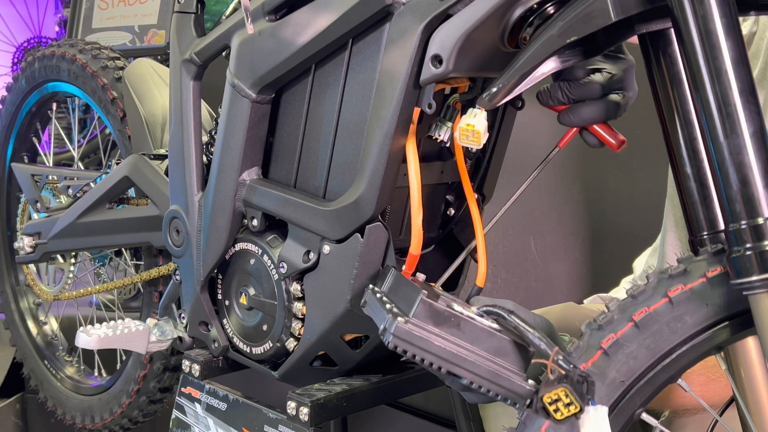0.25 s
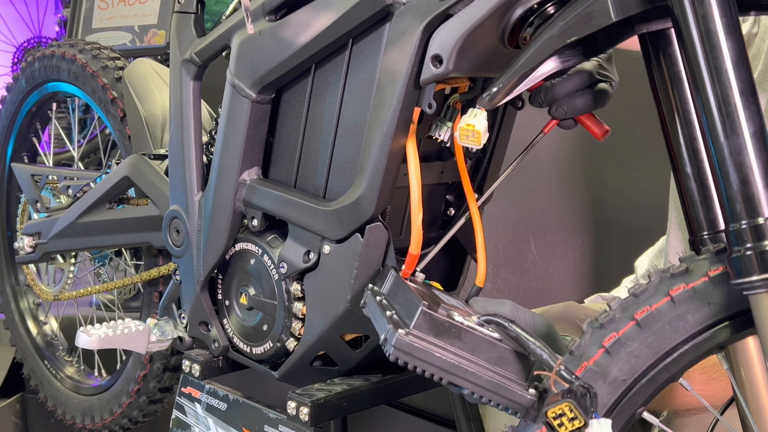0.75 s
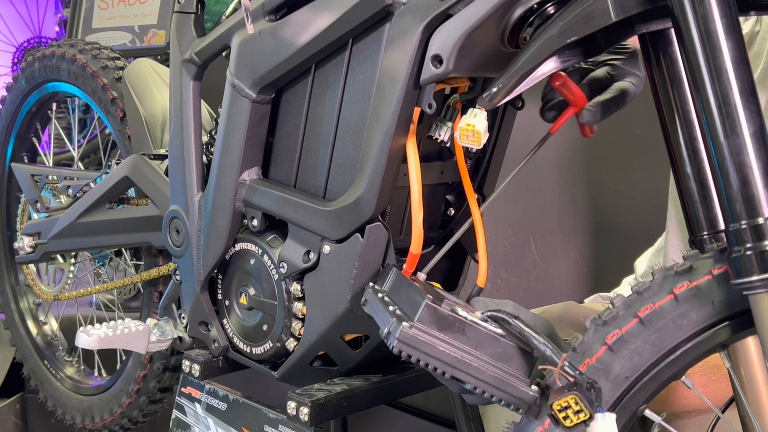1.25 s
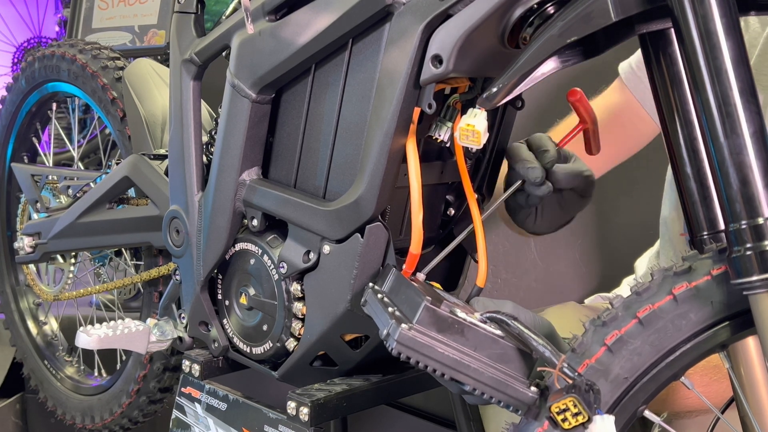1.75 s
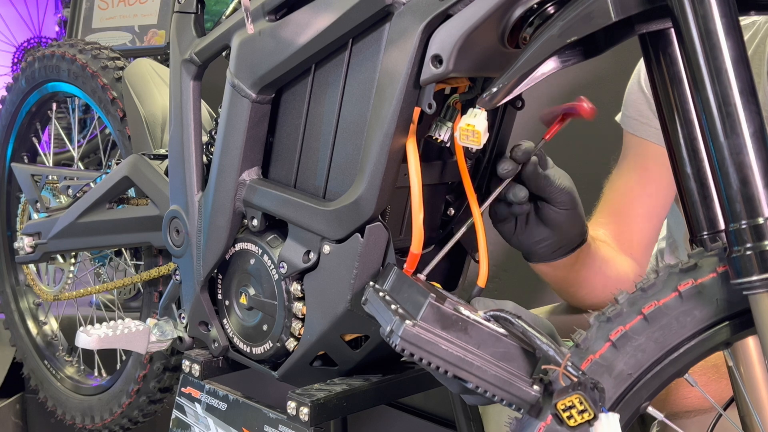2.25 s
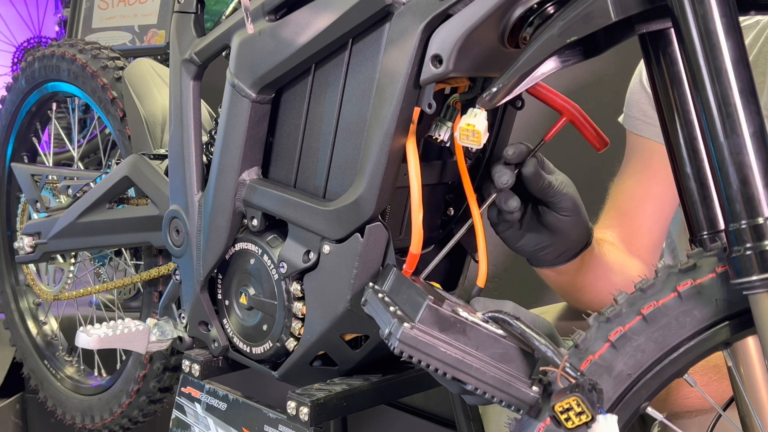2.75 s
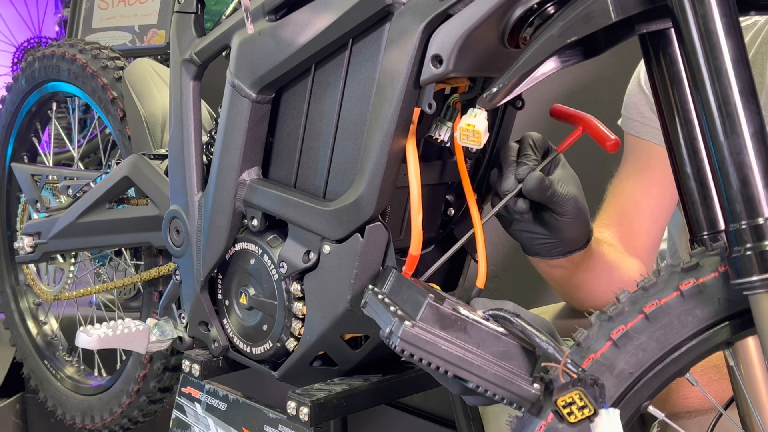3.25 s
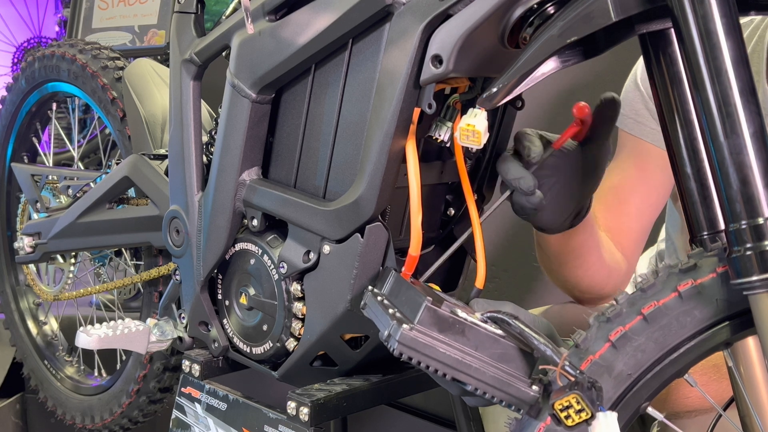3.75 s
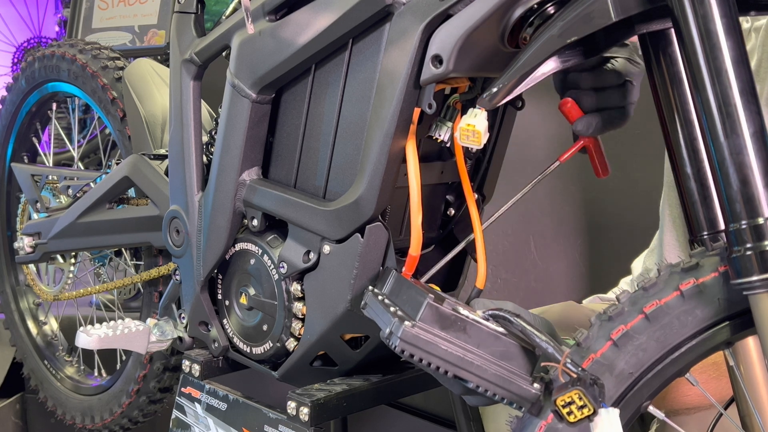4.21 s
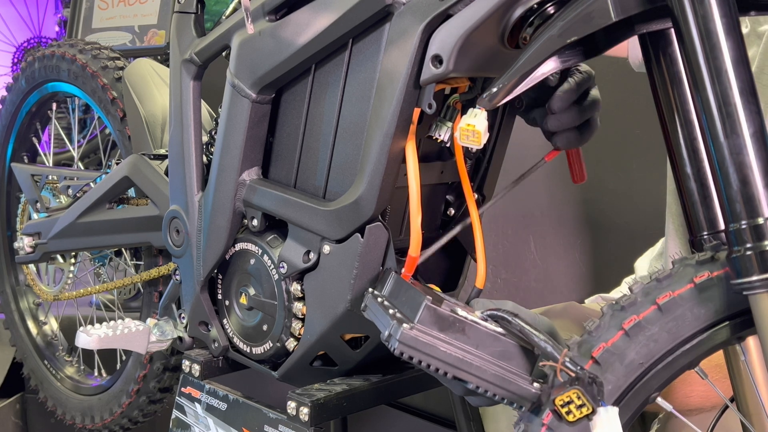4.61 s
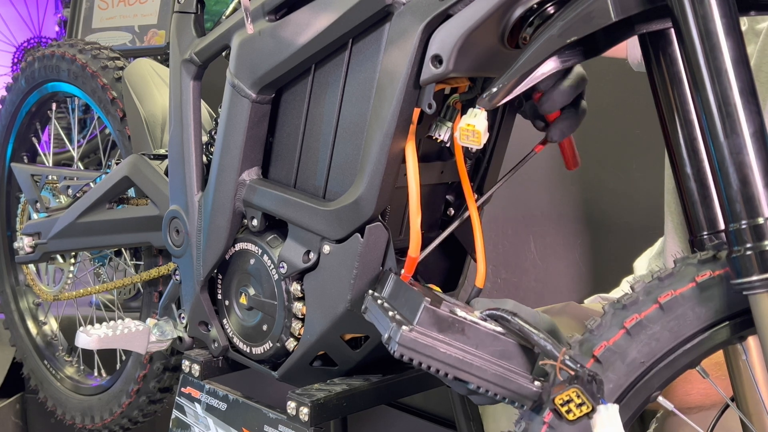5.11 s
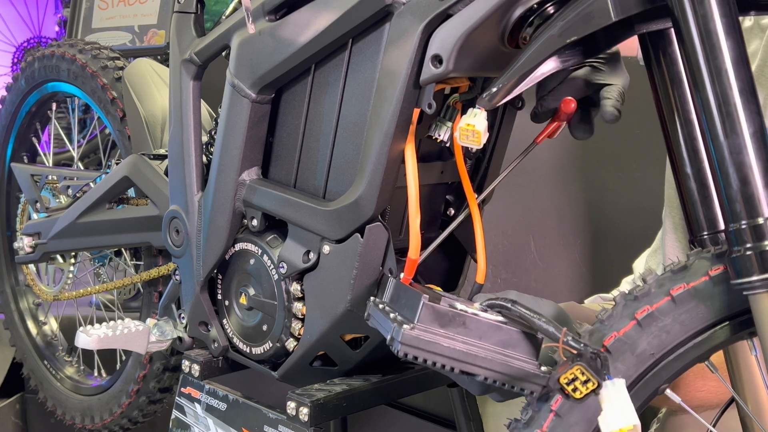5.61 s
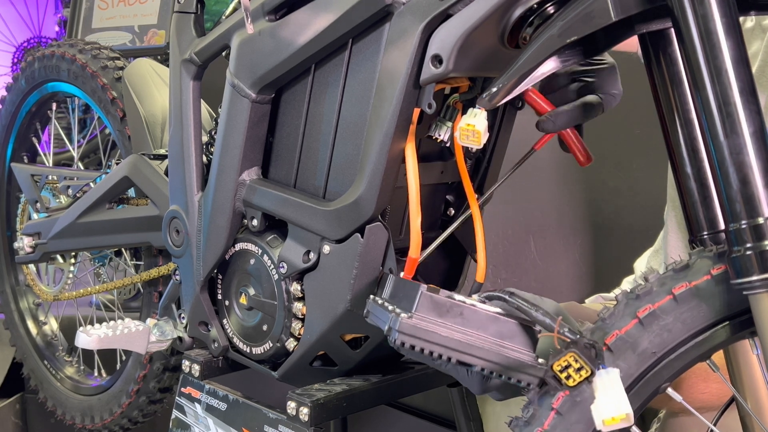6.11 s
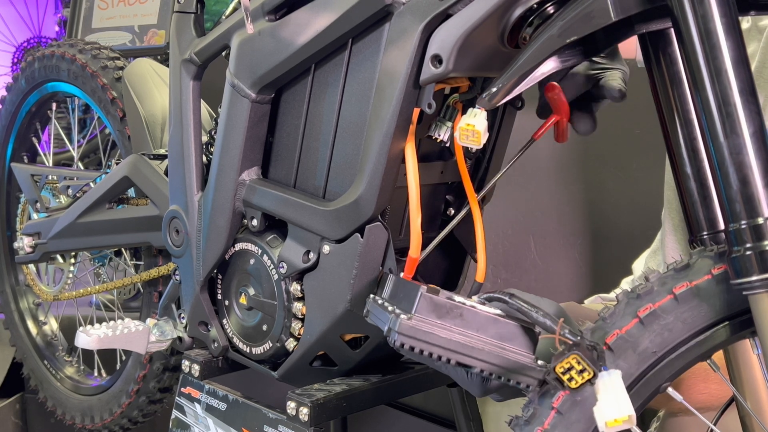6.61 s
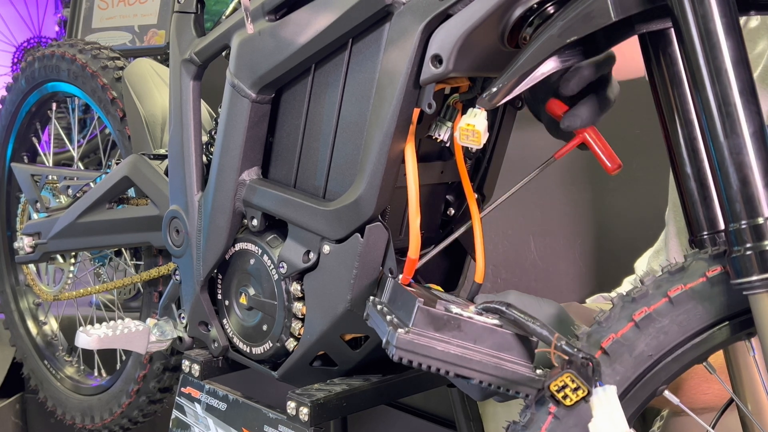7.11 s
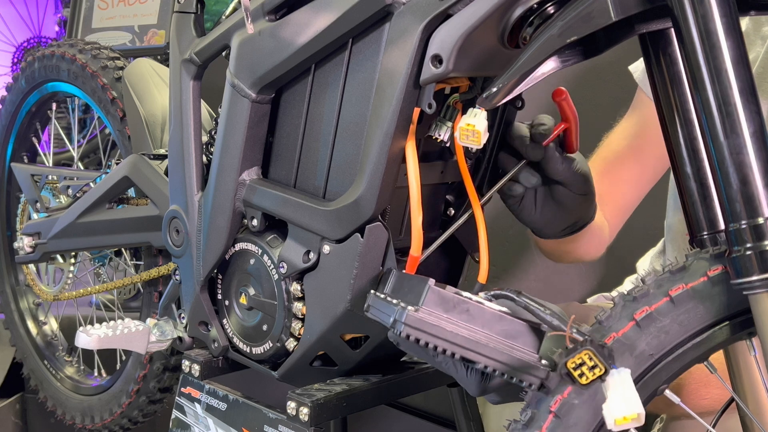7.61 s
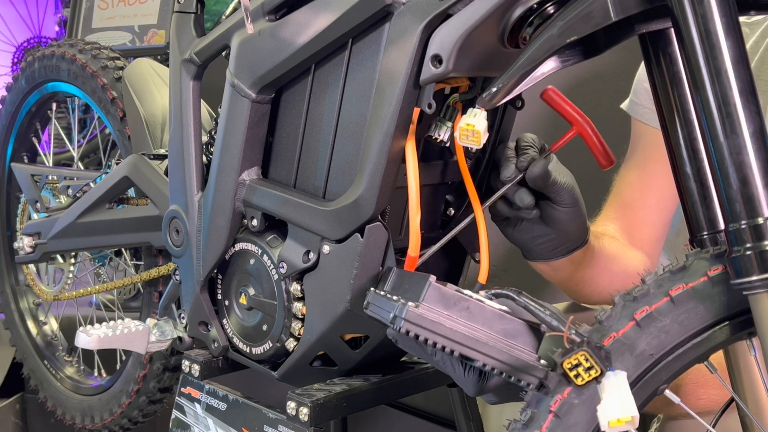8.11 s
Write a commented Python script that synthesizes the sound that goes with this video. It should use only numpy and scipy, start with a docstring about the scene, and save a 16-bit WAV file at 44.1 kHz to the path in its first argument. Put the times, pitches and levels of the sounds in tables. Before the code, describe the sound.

Close-up wrench work in a small workshop: irregular dry steel ticks, tiny scrapes and squeaks, one sharp slam and one loose clunk.

```python
"""The soft steady rush of a small workshop comes first, with a glove's faint rustle on a handle.
Close by, a T-handle socket wrench works on the nuts of a motorbike: noise cracks and decaying modes
make its taps and one slam, runs of tiny slips its scrapes, unsteady sine tones its squeaks.
Bumps swell in one mode, thuds in two; a small part jiggles, a loose housing knocks once.
Short wall reflections follow, built from decaying noise; the recorder cuts the top."""
import sys
import numpy as np
from scipy import signal
from scipy.fft import rfft, irfft
from scipy.io import wavfile
from scipy.ndimage import uniform_filter1d

SR = 44100
rng = np.random.default_rng(int(sys.argv[2]) if len(sys.argv) > 2 else 0)


def digitize_waveform(pressure):
    """Quantize a signal to 16-bit integers and store it at the path in sys.argv[1].

    Rows of a 2-D input are taken as channels; values are limited to [-1, 1].
    """
    field = np.atleast_2d(pressure).T
    bounded = np.clip(field, -1, 1)
    quanta = np.round(bounded * 32767).astype(np.int16)
    wavfile.write(sys.argv[1], SR, quanta)


N = 368676  # samples in the scene
T = np.arange(SR // 5) / SR  # the time axis of one contact, in seconds


def undb(db):
    """Decibels to gain."""
    return 10 ** (np.asarray(db) / 20)


def unit(x, span_s=None):
    """Scale to rms 1 over the first span_s seconds, or over the whole."""
    head = x if span_s is None else x[:int(span_s * SR)]
    return x / np.sqrt(np.mean(head ** 2) + 1e-20)


def band(x, lo_hz, hi_hz, order=4):
    """Causal band-pass."""
    sos = signal.butter(order, [lo_hz, min(hi_hz, SR / 2 - 1)], "band", fs=SR, output="sos")
    return signal.sosfilt(sos, x)


def fade(t, t60):
    """Exponential decay, 60 dB down after t60 seconds."""
    return np.exp(-np.log(1000) * t / t60)


def add(track, s, sound):
    """Mix a sound in at time s."""
    i = int(s * SR)
    track[i:i + len(sound)] += sound[:N - i]


def walk(rate_hz):
    """Random drift with a spread near 1, gliding to a new value rate_hz times a second."""
    k = int(SR / rate_hz)
    steps = np.repeat(rng.standard_normal(N // k + 1), k)
    return uniform_filter1d(steps, k)[:N]


# The rush of the room air. Each row: frequency in Hz, relative density in dB per Hz.
AIR = [(25, -40.5), (195, -39), (228, -18), (315, -34.5), (385, -18), (470, -1.5), (600, 0.5), (1300, 2),
       (2200, -2.5), (3200, -6.5), (6000, -14.5), (9500, -19), (12700, -22), (16000, -38)]
# Narrow steady resonances in it, as of a distant fan. Each row: centre in Hz, width in Hz, level in dB.
FAN = [(477.4, 12, -71.5), (2500, 71, -71)]


def air(rush_db=-57.5):
    """Noise shaped to the rush of the room plus two narrow noise bands; the level wavers very slightly."""
    hz = np.maximum(np.fft.rfftfreq(N, 1 / SR), 1)
    points_hz, db = np.transpose(AIR)
    shape = undb(np.interp(np.log(hz), np.log(points_hz), db))
    rush = irfft(rfft(rng.standard_normal(N)) * shape, N)
    fan = np.zeros(N)
    for centre, width, fan_db in FAN:
        hum = band(rng.standard_normal(N), centre - width / 2, centre + width / 2, order=2)
        fan += undb(fan_db) * unit(hum)
    return (undb(rush_db) * unit(rush) + fan) * undb(.3 * walk(4.1))


# The fingers work the handle close by. Each row: start in seconds, end in seconds.
GRIPS = [(1.2, 1.75), (5.3, 6.15), (6.45, 7.35), (7.6, 7.85)]
# The glove's creases crackle, each in its own range. Each row: low Hz, high Hz, level in dB.
CREASES = [(5000, 9000, -78.5), (8100, 11600, -80.5), (11100, 14200, -79.5)]


def glove(crinkles_per_s, spread_db, twirl_db=-14, regrip_s=0.21):
    """Rubber creases crackle as random noise puffs; between grips the twirled shaft rustles less."""
    t = np.arange(N) / SR
    gripping = sum(1. * ((t > start) & (t < end)) for start, end in GRIPS)
    holding = uniform_filter1d(gripping, int(regrip_s * SR))  # a change of grip takes a moment
    out = np.zeros(N)
    for lo_hz, hi_hz, db in CREASES:
        sizes = undb(spread_db * np.minimum(rng.standard_exponential(N), 2))
        crinkles = (rng.random(N) < crinkles_per_s / SR) * sizes
        puffs = signal.oaconvolve(crinkles, T * fade(T, 0.048))[:N]
        envelope = puffs * undb(twirl_db * (1 - holding))
        out += undb(db) * unit(band(envelope * rng.standard_normal(N), lo_hz, hi_hz, order=3))
    return out


def workshop(x, low_db, high_db, low_t60, high_t60, delay_s):
    """Dense reflections off the bike and near walls, as decaying noise; the treble dies first."""
    arrive = np.clip(T / delay_s - 1, 0, 1)
    low = band(rng.standard_normal(len(T)), 400, 4200, order=2) * fade(T, low_t60)
    high = band(rng.standard_normal(len(T)), 3800, 15000, order=2) * fade(T, high_t60)
    reflections = arrive * (undb(low_db) * low + undb(high_db) * high)
    return signal.fftconvolve(x, reflections)[:N]


def low_thump(work):
    """A very faint low thump under the work, made from the rectified sound."""
    return undb(-53) * band(np.abs(work), 30, 300, order=1)


def ring(modes, detune, damping=1):
    """Impulse response of a part; grip and point of contact shift its modes a little each time."""
    hz, db, t60 = np.transpose(modes)[:, :, None]
    shift, weight = rng.standard_normal((2, len(modes), 1))
    side = (-1) ** np.arange(len(modes))[:, None]  # neighbouring modes swing opposite ways
    swing = np.sin(2 * np.pi * hz * (1 + detune * shift) * T)
    return np.sum(side * undb(db + weight) * fade(T, t60 / damping) * swing, axis=0)


# The five registers of a contact: thump, knock, clack, tick, sizzle. Their edges in Hz, in one list.
REGISTERS = [470, 1350, 2000, 5000, 9500, 15000]
REGISTER_CENTRES_HZ = np.sqrt(np.multiply(REGISTERS[:-1], REGISTERS[1:]))
REGISTER_OCTAVES = np.log2(REGISTER_CENTRES_HZ / 3160)


def colour(usual_db, level_db, bright_db=0, lift_db=0):
    """Register levels of one contact: its kind's colour, tilted by brightness, arched by midrange lift."""
    tilt = bright_db * REGISTER_OCTAVES
    arch = -lift_db * (REGISTER_OCTAVES / 2) ** 2
    return np.array(usual_db) + level_db + tilt + arch


def voiced(sound, levels_db, span_s):
    """Hardness and place of the contact set how strongly each register speaks."""
    sound = band(sound, 450, 14000, order=2)
    out = np.zeros(len(sound))
    for lo, hi, db in zip(REGISTERS, REGISTERS[1:], levels_db):
        out += undb(db) * unit(band(sound, lo, hi), span_s)
    return out


def blows(table, modes, usual_db, crack_db, crack_t60, rise_s, detune, chatter_db, damping=1):
    """Each blow is a noise crack, as of many dead high modes, and the part's ring, renewed by chatter."""
    out = np.zeros(N)
    level_span_s = .01
    for s, *touch in table:
        crack = band(rng.standard_normal(len(T)), 1800, 16000, order=1) * fade(T, crack_t60)
        chatter = rng.standard_normal(len(T)) * fade(T, 0.046)
        push = undb(chatter_db) * chatter / np.sqrt(np.sum(chatter ** 2))
        push[0] = 1
        body = signal.fftconvolve(push, ring(modes, detune, damping))[:len(T)]
        onset = 1 - np.exp(-(T / rise_s) ** 2)  # the faces take a moment to seat
        blow = onset * (undb(crack_db) * unit(crack, level_span_s) + unit(body, level_span_s))
        add(out, s, voiced(blow, colour(usual_db, *touch), level_span_s))
    return out


# The socket taps on the nut; a glancing tap is bright, a square one dull. Each row: start in seconds,
# level in dB before colouring, brightness in dB per octave, midrange lift in dB.
TAPS = [(.376, -56.5, -1.6, -8.5), (.7283, -44, 1.3, -2.5), (.7742, -56, 11.5, 9.5),
        (.9452, -59, 10.5, -7.5), (1.0859, -43.5, -.5, -7), (1.0915, -61, -6, -5), (1.242, -61, 4.5, 4),
        (2.0996, -49.5, 4.5, 4), (2.3712, -47.5, 10, 4), (2.4854, -40, -5.5, -4), (2.498, -46, -3.5, 1),
        (2.7926, -48, -3, 5), (3.1085, -56, -5, 10.5), (3.2567, -61.5, -1, -4.5),
        (3.371, -44.5, -1.5, -2.5), (3.375, -40, 2, 18.5), (5.0533, -62.5, 7, -7), (5.068, -54, 7.5, 2),
        (5.0795, -55.5, 6, 5), (5.1999, -53, 1, 3.5), (5.6504, -37, -2.5, 6), (6.0149, -52, -1, 14),
        (6.176, -41, 2.5, 10), (6.2747, -61, -0.5, -1), (6.6437, -68, 1.5, -11), (7.1675, -49.5, -1, 6),
        (7.4108, -49, 3.5, 5), (7.4133, -45, -1, -0.5), (7.6276, -71.5, 4.5, -10), (8.0212, -42, -1, -4),
        (8.0371, -51, -9.5, 1), (8.1515, -60.5, 0, -8.5)]
# The wrench seated on the nut, damped by the glove. Each row: nominal Hz, relative dB, nominal t60 in seconds.
WRENCH = [(622, -12.5, 0.021), (747, -11.5, 0.023), (1031, -1, 0.02), (1245, -7, 0.017),
          (1509, -7.5, 0.054), (1660, -3.5, 0.038), (2405, -6.5, 0.027), (2725, -10.5, 0.036),
          (3105, -1, 0.033), (3550, -4, 0.022), (3883, -8, 0.027), (4560, -20.5, 0.022), (5550, 0.5, .012),
          (6050, -5, 0.03), (6440, -2, 0.014), (7554, 7.5, 0.014), (7960, -13, 0.01), (10870, -3, 0.018),
          (11900, 5.5, 0.01), (12860, 3.5, 0.0072)]
# Usual colour of a tap: dB added to thump, knock, clack, tick and sizzle.
TAP_COLOUR = [-1, -2.5, 1, -1, 0.5]


def taps():
    """The socket strikes the nut within its play and rings the wrench."""
    return blows(TAPS, WRENCH, TAP_COLOUR, crack_db=-6.5, crack_t60=0.036, rise_s=0.00029,
                 detune=0.028, chatter_db=-4.5)


def slips(table, modes, usual_db, slips_per_s, grit_db, release_t60):
    """Steel slips on steel in a quick run of tiny catches, each ringing the part, with gritty noise."""
    out = np.zeros(N)
    for s, length, *touch in table:
        press = np.minimum(T / 0.0059, 1) * fade(np.maximum(T - length, 0), release_t60)
        catches = (rng.random(len(T)) < slips_per_s / SR) * rng.standard_normal(len(T)) * press
        body = signal.fftconvolve(catches, ring(modes, 0.048))[:len(T)]
        grit = rng.standard_normal(len(T)) * press
        rub = unit(body) + undb(grit_db) * unit(grit)
        add(out, s, voiced(rub, colour(usual_db, *touch), length))
    return out


# Steel slides on steel, between or just after blows. Each row: start in seconds, length in seconds
# before release, level in dB before colouring, brightness in dB per octave.
SCRAPES = [(.379, .021, -59.5, 1.5), (1.311, 0.015, -61.5, 0), (1.785, 0.029, -66.5, 0.2),
           (1.975, 0.054, -57.5, 0), (2.331, 0.076, -55.5, -0.5), (2.473, 0.0083, -64, -5),
           (4.101, 0.033, -72.5, 4), (4.432, 0.032, -74, 5), (5.061, .014, -54.5, 7), (5.572, .016, -68, 1),
           (5.641, 0.011, -58, -2), (5.975, 0.0077, -65.5, 0), (6.471, 0.032, -67.5, 1.7),
           (6.583, .016, -65.5, 0.5), (6.648, 0.02, -68, 1), (6.749, 0.014, -71.5, 8.5),
           (6.836, 0.011, -76, 6), (7.726, 0.018, -80, 4.5), (7.867, 0.064, -63, 0.5)]
# Usual colour of a scrape: dB added to thump, knock, clack, tick and sizzle.
SCRAPE_COLOUR = [3.5, -6, -2.5, 0.5, 2]


def scrapes():
    """The socket slides in its play; many small slips ring the wrench."""
    return slips(SCRAPES, WRENCH, SCRAPE_COLOUR, slips_per_s=1100, grit_db=-6.5, release_t60=0.036)


# Light touches that leave the steel free to ring. Each row: start in seconds, level in dB before
# colouring, brightness in dB per octave.
TINKS = [(.39, -58.5, 2.5), (4.7953, -45, 0), (4.8312, -54.5, 2), (4.8701, -68.5, 7)]
# The free steel socket. Each row: nominal Hz, relative dB, t60 in seconds.
SOCKET = [(4060, -9, 0.021), (4770, -10, 0.071), (7670, -1.5, 0.072), (11300, 6, 0.06), (11900, 1, 0.066)]
# Usual colour of a tink: dB added to thump, knock, clack, tick and sizzle.
TINK_COLOUR = [-21, -27, -3.5, 3, 11]


def tinks():
    """A light touch rings the free socket's modes, most of them longer than a seated wrench's."""
    return blows(TINKS, SOCKET, TINK_COLOUR, crack_db=-8.5, crack_t60=0.029, rise_s=0.000087,
                 detune=0.0015, chatter_db=-11)


def swell(hz, db, t60, rise_s=0.0065):
    """A single tone swells in softly and dies away."""
    shape = (1 - np.exp(-(T / rise_s) ** 2)) * fade(T, t60)
    return undb(db) * shape / shape.max() * np.sin(2 * np.pi * hz * T)


# Soft pushes, or one wrench mode ringing on after a tap or the slam. Each row: start in seconds,
# frequency in Hz, envelope peak in dB.
BUMPS = [(0.451, 1245, -37.5), (0.732, 1587, -38.5), (1.093, 1530, -41), (1.342, 587, -54),
         (2.018, 783, -43), (2.036, 772, -41.5), (2.372, 1540, -40), (2.68, 1040, -35.5),
         (2.792, 730, -38.5), (3.113, 1480, -42.5), (5.078, 1270, -48), (7.158, 525, -41.5),
         (7.411, 1730, -40), (8.019, 1577, -29), (8.036, 670, -37), (8.041, 1240, -36)]


def bumps():
    """Single decaying tones: soft pushes, or one wrench mode ringing on after a tap or the slam."""
    out = np.zeros(N)
    for s, hz, db in BUMPS:
        add(out, s, swell(hz, db, t60=0.031))
    return out


# The thread squeaks as it turns. Each row: start in seconds, length in seconds, mean Hz,
# level in dB rms at the middle of the squeak.
SQUEAKS = [(1.212, 0.024, 6120, -54), (1.976, 0.07, 1025, -55), (2.318, 0.067, 1095, -47.5),
           (7.315, 0.093, 2560, -59.5), (7.825, 0.062, 2600, -56.5), (7.87, 0.047, 987, -53),
           (7.886, .042, 1595, -48.5), (8.144, .035, 3750, -60)]


def squeaks(waver):
    """Stick and slip lock on one resonance for a moment; the pitch is unsteady."""
    out = np.zeros(N)
    for s, length, hz, db in SQUEAKS:
        n = int(length * SR)
        pitch = hz * (1 + waver * walk(180)[:n])
        tone = np.sqrt(2) * np.sin(2 * np.pi * np.cumsum(pitch) / SR)
        arch = np.sin(np.pi * np.arange(n) / n)
        add(out, s, undb(db) * arch * tone)
    return out


def rattle(table, modes, usual_db, length_s, drop_db, bright_db, t60, grit_db):
    """Each heavy blow leaves the faces chattering, weaker and duller than the blow."""
    rebound_s = .011  # the parts start to rattle after this
    runs = [(s + rebound_s, length_s, db + drop_db, bright_db) for s, db in table]
    return slips(runs, modes, usual_db, slips_per_s=2200, grit_db=grit_db, release_t60=t60)


# The socket slams home on the nut. Each row: start in seconds, level in dB before colouring.
SLAMS = [(2.632, -21.5)]
# Usual colour of a slam: dB added to thump, knock, clack, tick and sizzle.
SLAM_COLOUR = [5.5, -13, -1.5, -1, -3]


def slams():
    """A hard blow on the nut with a short, strong crack rings the wrench, then it rattles."""
    blow = blows(SLAMS, WRENCH, SLAM_COLOUR, crack_db=3.5, crack_t60=0.0093, rise_s=0.00091,
                 detune=0.0093, chatter_db=-20.5, damping=0.88)
    return blow + rattle(SLAMS, WRENCH, TAP_COLOUR, length_s=.022, drop_db=-24.5, bright_db=-2.0,
                         t60=0.09, grit_db=-4)


# The hand leans on the wrench and the frame thuds. Each row: start in seconds, level in dB.
THUDS = [(5.404, -47.5), (6.505, -43.5), (6.64, -49.5), (7.16, -53.5)]
# The frame. Each row: frequency in Hz, dB added to the thud's level for the envelope peak, t60 in seconds.
FRAME = [(234, -27, .09), (488, -2.5, 0.093)]


def thuds():
    """A cushioned push wakes both modes of the frame."""
    out = np.zeros(N)
    for s, db in THUDS:
        for hz, mode_db, t60 in FRAME:
            add(out, s, swell(hz, db + mode_db, t60))
    return out


# A loose small part jiggles. Each row: start in seconds, level in dB before colouring.
JIGGLES = [(5.826, -46), (5.834, -43.5), (5.8425, -43)]
# That small part. Each row: nominal Hz, relative dB, t60 in seconds.
SMALL_PART = [(2860, -6, 0.031), (3370, -3, 0.035), (4460, -8.5, 0.067), (5380, -8, .03), (6170, -3, 0.029),
              (11800, -10, 0.023)]
# Usual colour of a jiggle: dB added to thump, knock, clack, tick and sizzle.
JIGGLE_COLOUR = [-27, -33, 0, -16, -25]


def jiggles():
    """Soft-edged blows in quick succession ring the small part."""
    return blows(JIGGLES, SMALL_PART, JIGGLE_COLOUR, crack_db=1, crack_t60=0.022, rise_s=0.0024,
                 detune=0.012, chatter_db=-14)


# The loose housing hits the frame. Each row: start in seconds, level in dB before colouring.
KNOCKS = [(6.1783, -20)]
# The housing. Each row: nominal Hz, relative dB, nominal t60 in seconds.
HOUSING = [(587, -14, 0.035), (840, -18.5, 0.084), (1200, 0.5, 0.032), (1598, 4.5, .055),
           (1870, 8.5, 0.012), (2320, -6.5, 0.065), (2380, -5.5, 0.082), (2690, 2, 0.025),
           (3190, -3.5, 0.044), (3370, 6.5, 0.024), (4320, -12, 0.03), (6170, -11, 0.058),
           (10160, -15, .04)]
# Usual colour of a knock: dB added to thump, knock, clack, tick and sizzle.
KNOCK_COLOUR = [-2, -1, 2, -13.5, -25]


def knocks():
    """The housing's modes ring from a heavy blow, then it rattles."""
    blow = blows(KNOCKS, HOUSING, KNOCK_COLOUR, crack_db=-3.5, crack_t60=0.018, rise_s=0.00065,
                 detune=0.0021, chatter_db=-8, damping=1.17)
    return blow + rattle(KNOCKS, HOUSING, KNOCK_COLOUR, length_s=0.013, drop_db=-24.5, bright_db=-1.5,
                         t60=0.096, grit_db=1)


def scene():
    """Glove, wrench, bike and housing in the room."""
    work = glove(crinkles_per_s=14, spread_db=7)
    work += taps() + scrapes() + tinks() + bumps() + squeaks(waver=0.052)
    work += slams() + thuds() + jiggles() + knocks()
    room = workshop(work, low_db=-40.5, high_db=-47.5, low_t60=0.14, high_t60=0.12, delay_s=0.0028)
    return (work + low_thump(work) + room + air())[None]


def record(dry):
    """The recorder cuts the top, steeply above 16 kHz."""
    return signal.sosfilt(signal.ellip(8, .2, 70, 16000, fs=SR, output="sos"), dry)


dry = scene()
out = record(dry)
digitize_waveform(out)
```